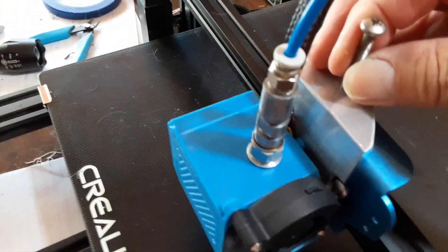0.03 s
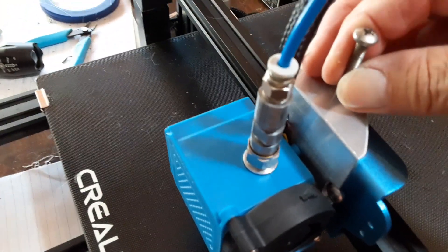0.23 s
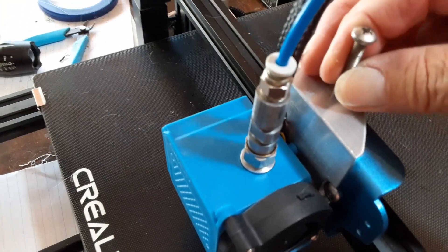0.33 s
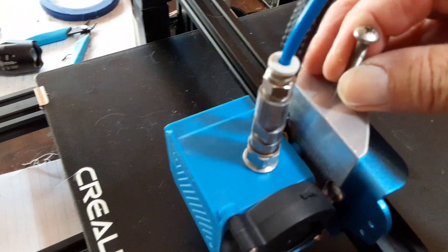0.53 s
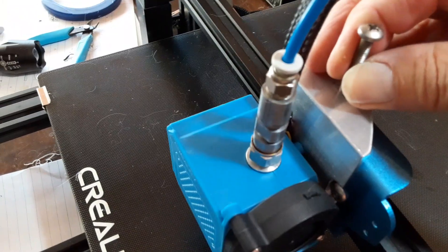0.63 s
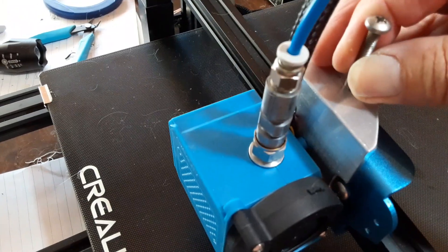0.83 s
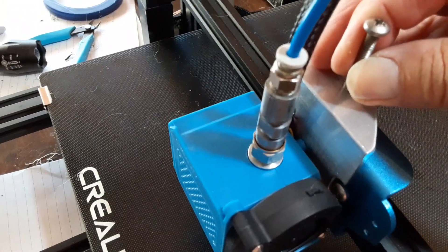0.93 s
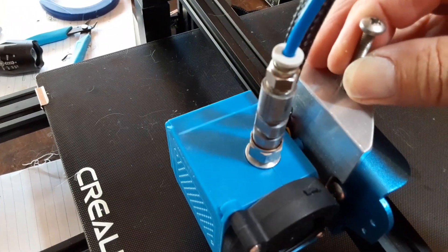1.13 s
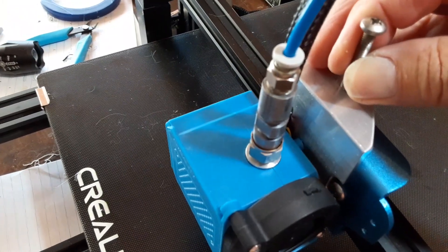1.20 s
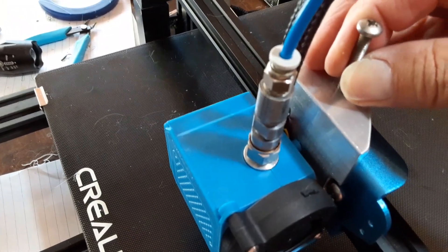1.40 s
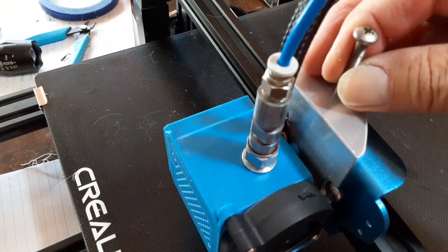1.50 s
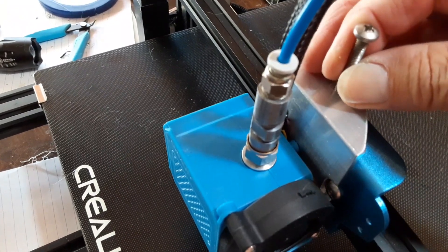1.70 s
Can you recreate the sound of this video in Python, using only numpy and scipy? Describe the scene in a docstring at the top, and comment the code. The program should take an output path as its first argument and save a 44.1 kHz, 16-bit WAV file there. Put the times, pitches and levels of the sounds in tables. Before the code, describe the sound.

Three sharp metal clicks, evenly spread, come from a hand working a small part on a 3D printer, with faint dull knocks from the machine. A fan rushes and hums steadily, heard close up in a small room.

```python
"""A fan's rush and a mains hum, close up at a 3D printer in a small room.
A hand rubs a metal part by the print head; it catches lightly, then snaps three times.
Each snap is an impulse: it rings the metal's modes briefly, scatters off the machine, leaves a diffuse
tail in the room and jolts the frame, whose low modes answer with a dull knock.
Between and after the snaps the hand nudges the frame, which thuds."""
import sys
import numpy as np
from scipy import signal
from scipy.fft import rfft, irfft
from scipy.io import wavfile

SR = 44100
rng = np.random.default_rng(int(sys.argv[2]) if len(sys.argv) > 2 else 0)


def master(y):
    """Save y as 16-bit WAV."""
    cut = np.clip(np.atleast_2d(y).T, -1, 1)
    pcm = np.round(cut * 32767)  # scale
    wavfile.write(sys.argv[1], SR, pcm.astype(np.int16))


N = 77175
T = np.arange(N) / SR


def from_db(db):
    """Amplitude ratio of a level in decibels."""
    return 10 ** (np.asarray(db) / 20)


def panned(db):
    """Left and right gains for a level difference."""
    return from_db(np.array([[db], [-db]]) / 2)


def over_bins(points):
    """A curve interpolated over log frequency at every bin."""
    hz, value = np.transpose(points)
    return np.interp(np.log(np.arange(N // 2 + 1) * SR / N + 1), np.log(hz), value)


def noise(spectrum, correlation=0):
    """Spectrally shaped stereo noise of rms 1."""
    mid, side = rfft(rng.standard_normal((2, N)))
    both = np.sqrt(1 + correlation) * mid + np.sqrt(1 - correlation) * side * [[1], [-1]]
    x = irfft(both * from_db(over_bins(spectrum)), N)
    return x / x.std()


def drift(hz):
    """Low-passed noise: a slow wander of rms 1."""
    pole = np.exp(-2 * np.pi * hz / SR)
    x = signal.lfilter([1], [1, -2 * pole, pole * pole], rng.standard_normal(2 * N))[N:]
    return (x - x.mean()) / x.std()


def burst(start_s, rise_s, t60_s):
    """Linear rise under an exponential decay."""
    age = np.maximum(T - start_s, 0)
    return np.minimum(age / rise_s, 1) * np.exp(-np.log(1000) * age / t60_s)


def ring(hz, start_s, rise_s, t60_s):
    """Free vibration of one mode: a damped sinusoid."""
    return np.sin(2 * np.pi * hz * (T - start_s)) * burst(start_s, rise_s, t60_s)


def high_pass(x, hz, order=2):
    """Roll-off below a corner frequency."""
    return signal.sosfilt(signal.butter(order, hz, "high", fs=SR, output="sos"), x + 1e-18)


# Air noise: frequency_hz, level_db
FAN_SPECTRUM = [(25, -32), (45, -18.5), (62, -0.5), (85, -4), (120, -7.5), (160, 0), (230, -1.5),
                (320, -6.5), (450, -8), (700, -8.5), (1100, -10.5), (1600, -9), (2600, -15.5), (4000, -22),
                (5500, -28.5), (7800, -45.5), (10000, -35.5), (12500, -25.5), (16000, -31)]
# Likeness of left and right: frequency_hz, correlation
FAN_CORRELATION = [(30, 0.029), (100, 0.83), (250, 0.73), (600, 0.46), (1500, 0), (4000, 0.011), (16000, 0)]

def fan():
    """Turbulent air radiates steady broadband noise."""
    return from_db(-53) * noise(FAN_SPECTRUM, over_bins(FAN_CORRELATION))


# Tones of the hum: pitch_hz, level_db, left_minus_right_db
HUM_TONES = [(120.3, -47.5, 2.5), (148.4, -65.5, 6), (177.3, -62, 6), (291.8, -69.5, 8),
             (320.3, -66.5, 8.5), (407, -73.5, 7)]

def hum(waver_hz=12, waver_rad=0.04, waver_db=0.86):
    """Mains hum and fainter tones waver by random phase and amplitude modulation."""
    out = 0
    for hz, db, pan_db in HUM_TONES:
        phase = 2 * np.pi * (hz * T + rng.random())
        phase += waver_rad * hz / HUM_TONES[0][0] * drift(waver_hz)
        amplitude = np.sqrt(2) * from_db(db + waver_db * drift(waver_hz))
        out += amplitude * panned(pan_db) * np.sin(phase)
    return out


# Soft noise: frequency_hz, level_db
SOFT_NOISE_SPECTRUM = [(300, 2), (1400, 0.5), (2400, 1.5), (3200, -0.5), (3850, 0.5), (4700, -1.5),
                       (6500, -9.5), (10000, -16), (13000, -9), (16000, -29)]

def rub_and_hiss(swell_s=0.035):
    """Amplitude-shaped soft noise: one light rub; separately, a faint hiss swells just before each snap."""
    envelope = from_db(-46.5) * burst(start_s=0.014, rise_s=0.052, t60_s=0.48)
    for start_s, *_, hiss_db, lead_s in SNAP_EVENTS:
        swell = np.clip((T - start_s + lead_s) / swell_s, 0, 1) * (T < start_s)
        envelope += from_db(hiss_db) * swell
    return envelope * noise(SOFT_NOISE_SPECTRUM)


# Tick of the part catching: frequency_hz, level_db
CATCH_SPECTRUM = [(500, 4), (1500, 5), (3000, -1), (6000, -8), (10000, -24)]

def catch():
    """A contact transient: the part catches once during the rub."""
    return from_db(-41.5) * noise(CATCH_SPECTRUM) * burst(start_s=0.056, rise_s=0.0023, t60_s=0.061)


# Grit of the contact: frequency_hz, level_db
GRIT_SPECTRUM = [(300, 5), (900, -9.5), (1900, -3.5), (2600, -0.5), (4500, 0), (5800, -7), (7500, -7.5),
                 (11000, -9), (13000, -15.5), (15000, -12.5), (16000, -40)]
# Its stereo balance: frequency_hz, left_minus_right_db
GRIT_PAN = [(1000, 13), (2500, 1.5), (3600, -1), (4400, 11), (6000, 14), (10000, -12), (15000, -2)]

def contact_grit():
    """Broadband contact noise, its left-right level difference varying with frequency."""
    gains = from_db(over_bins(GRIT_PAN) * [[1], [-1]] / 2)
    return irfft(rfft(noise(GRIT_SPECTRUM)) * gains, N)


# Modes of the metal part: pitch_hz, pressed_in_db, springing_back_db, left_minus_right_db
METAL_MODES = [(1235, -36.5, -28.5, 18.5), (1260, -24, -30, 2), (1840, -23, -25, -5.5),
               (2360, -23.5, -22, 16), (2550, -16, -17, 1), (2940, -21.5, -28, 17.5), (3378, -14, -33, 8),
               (3755, -12, -14.5, 9.5), (4050, -13, -12.5, -7.5), (4450, -20, -31, -10.5),
               (4675, -38, -14, -7.5), (6230, -17.5, -17.5, -9), (7680, -24.5, -47, -9),
               (8430, -32, -22, 9), (9450, -18.5, -38, 4), (11430, -22.5, -21.5, -11), (14600, -29, -39, 1)]

def metal_ring(start_s, springs_back, main_hz=3700, main_t60_s=0.0088):
    """Modal superposition: the direction of motion weights the modes, and higher ones die sooner."""
    out = 0
    for k, (hz, in_db, back_db, pan_db) in enumerate(METAL_MODES):
        gain = (-1) ** k * from_db(back_db if springs_back else in_db)
        t60_s = main_t60_s * np.sqrt(main_hz / hz)
        out += gain * panned(pan_db) * ring(hz, start_s, 1 / SR, t60_s)
    return out


# Snaps: start_s, level_db, springs_back (0 if pressed in), treble_db, jolt_db, hiss_db, hiss_lead_s
SNAP_EVENTS = [(0.2083, 1.5, 0, -6, 0, -49, 0.037), (0.7759, -1, 1, -6.5, -8, -51.5, 0.075),
               (1.5264, 0.5, 0, -1.5, 0, -44.5, 0.058)]

def snaps(right_lag_s=0.00028):
    """Impulse excitation: the metal part lets go with a gritty crack and a short ring."""
    out, grit = 0, contact_grit()
    for start_s, db, springs_back, treble_db, *_ in SNAP_EVENTS:
        crack = from_db(-14.5) * grit * burst(start_s, rise_s=0.0012, t60_s=0.013)
        snap = crack + metal_ring(start_s, springs_back)
        treble = high_pass(snap, hz=5800, order=1)
        out += from_db(db) * (snap + (from_db(treble_db) - 1) * treble)
    left, right = high_pass(out, hz=741)  # small parts radiate little bass
    return np.array([left, np.roll(right, round(right_lag_s * SR))])  # the part is nearer the left


# Diffuse tail: frequency_hz, level_db
ROOM_SPECTRUM = [(300, -0.5), (900, -4), (1500, -4), (2400, -1.5), (3000, -0.5), (3700, 3), (4400, 0.5),
                 (5200, -8), (7000, -13), (9800, -13), (11500, -15.5), (13000, -24), (16000, -26.5)]

def room(tail_db=-37.5, delay_s=0.0014):
    """Reverberation: each snap leaves an unpitched tail that decays exponentially."""
    envelope = sum(from_db(tail_db + db) * burst(start_s + delay_s, rise_s=0.0054, t60_s=0.32)
                   for start_s, db, *_ in SNAP_EVENTS)
    return envelope * noise(ROOM_SPECTRUM)


# Modes of the frame: pitch_hz, level_db, t60_s, left_minus_right_db
FRAME_MODES = [(177, -41.5, 0.29, -14), (273.7, -36, 0.07, -19.5), (334.3, -31, 0.14, -9.5),
               (400, -32, 0.1, -8), (466, -28, 0.027, -15)]

def knock(start_s, db, pitch_ratio, damping=1, rise_s=0.0018):
    """The frame gives softly, and its low damped modes sound one dull knock."""
    out = 0
    for hz, mode_db, t60_s, pan_db in FRAME_MODES:
        mode = ring(hz * pitch_ratio, start_s, rise_s, t60_s / damping)
        out += from_db(db + mode_db) * panned(pan_db) * mode
    return high_pass(out, hz=180)  # the lowest modes radiate poorly


def jolts(lag_s=0.0016, rebound_s=0.00729, rebound_db=-14, sway_hz=81.3, sway_db=-45):
    """Structure-borne sound: at each snap the frame knocks and rebounds, and the machine sways."""
    out = 0
    for start_s, _, springs_back, _, jolt_db, *_ in SNAP_EVENTS:
        pitch_ratio = 0.84 if springs_back else 1
        out += knock(start_s + lag_s, jolt_db, pitch_ratio)
        out += knock(start_s + lag_s + rebound_s, jolt_db + rebound_db, pitch_ratio)
        out += from_db(jolt_db + sway_db) * ring(sway_hz, start_s + rebound_s, rise_s=0.013, t60_s=0.39)
    return out


def scatter(x):
    """Early reflections off the machine: convolution with a short, noisy impulse response."""
    response = rng.standard_normal((2, N)) * burst(start_s=0.0026, rise_s=0.00053, t60_s=0.05)
    response /= np.linalg.norm(response, axis=1, keepdims=True)
    return from_db(-10) * signal.fftconvolve(x, response, axes=1)[:, :N]


# The hand against the frame: start_s, level_db
NUDGE_EVENTS = [(0.314, -8), (0.581, -17.5), (1.156, -42), (1.684, -16)]

def nudges():
    """Loading: the hand lowers and damps the frame's modes as it nudges them."""
    return sum(knock(start_s, db, pitch_ratio=0.616, damping=1.95) for start_s, db in NUDGE_EVENTS)


# Tick of the part settling: frequency_hz, level_db
SETTLE_SPECTRUM = [(1000, -9), (4000, 1), (6000, -3), (9000, 40), (12000, -24), (16000, -25)]

def settle():
    """A narrow-band transient near 9 kHz: the part settles after springing back."""
    return from_db(-27) * noise(SETTLE_SPECTRUM) * burst(start_s=0.7855, rise_s=0.0025, t60_s=0.02)


def scene():
    """Superposition: snaps, knocks and their reflections over soft noise, fan and hum."""
    metal = catch() + snaps() + settle()
    return fan() + hum() + rub_and_hiss() + metal + room() + jolts() + scatter(metal) + nudges()


def record(dry, cutoff_hz=16400):
    """Band limiting: a steep low-pass cuts the top."""
    return signal.sosfilt(signal.ellip(10, .1, 80, cutoff_hz, fs=SR, output="sos"), dry)


dry = scene()
out = record(dry)
master(out)
```